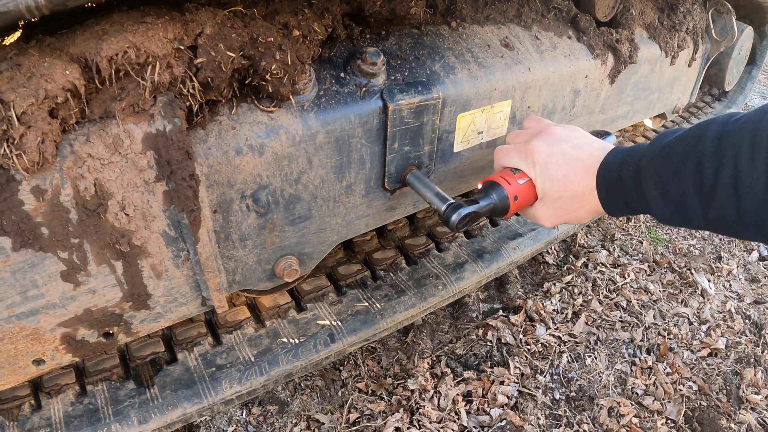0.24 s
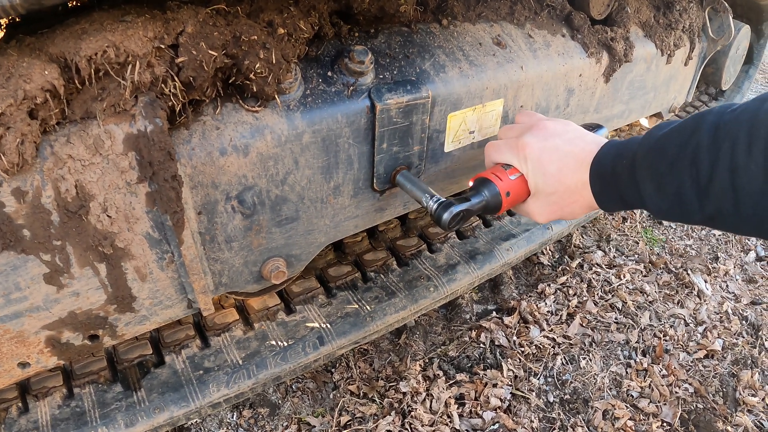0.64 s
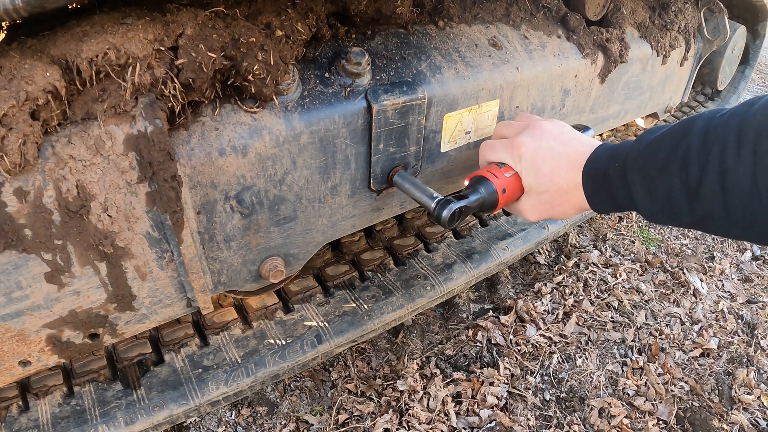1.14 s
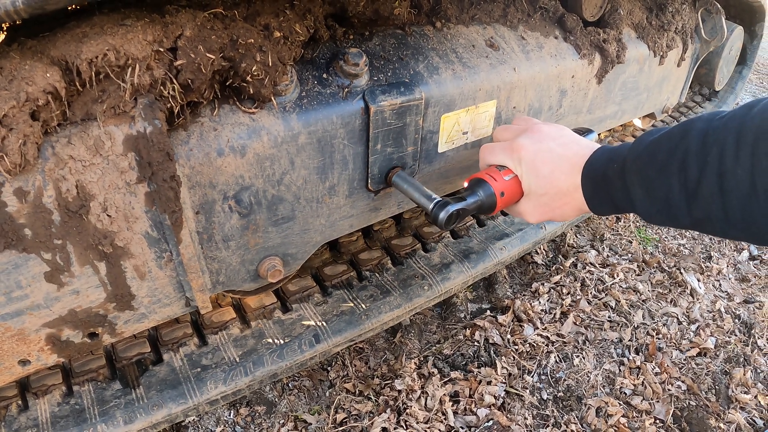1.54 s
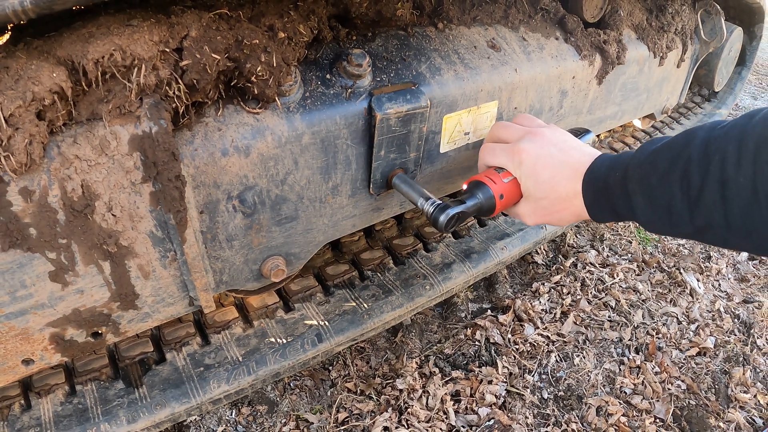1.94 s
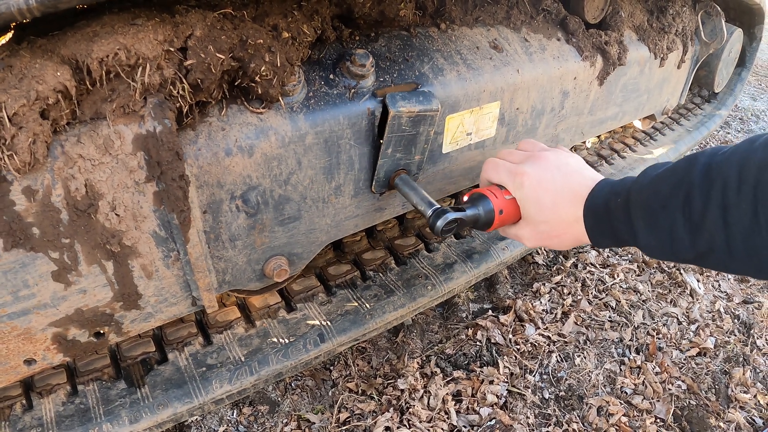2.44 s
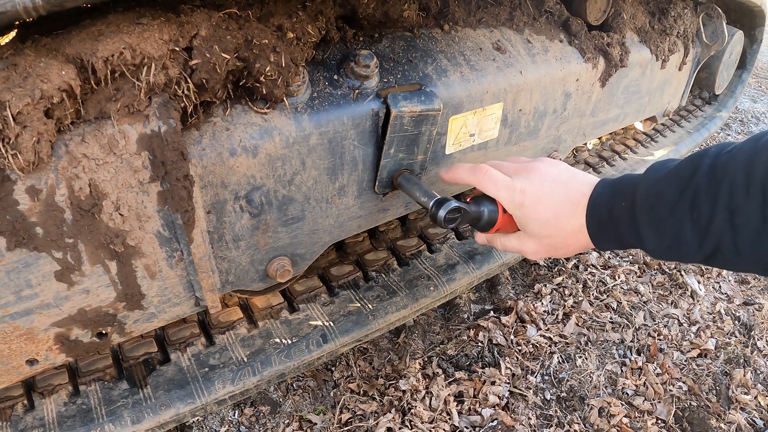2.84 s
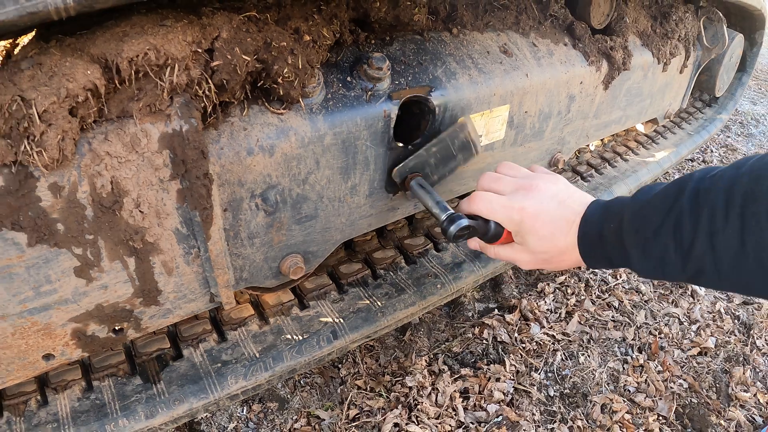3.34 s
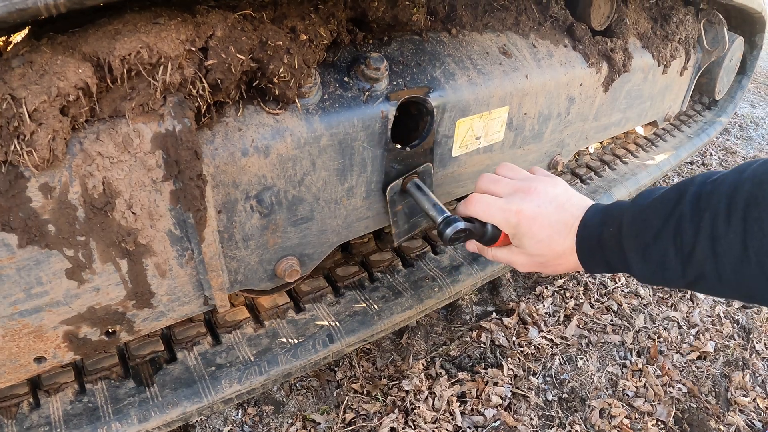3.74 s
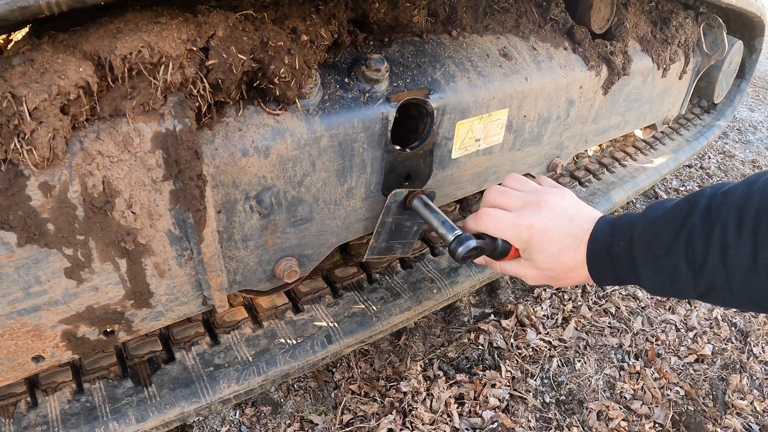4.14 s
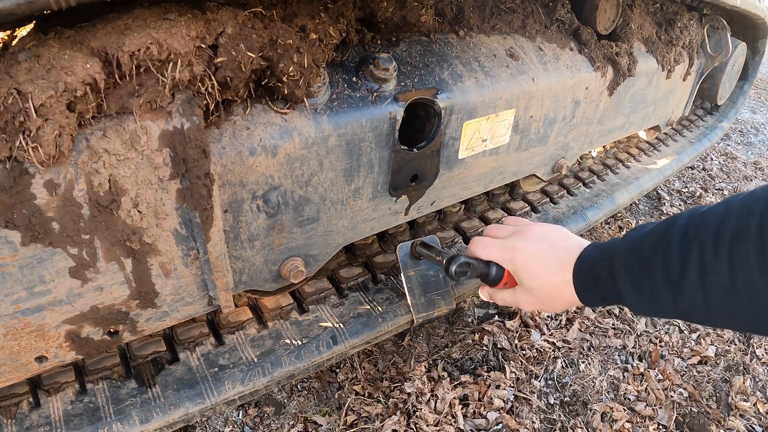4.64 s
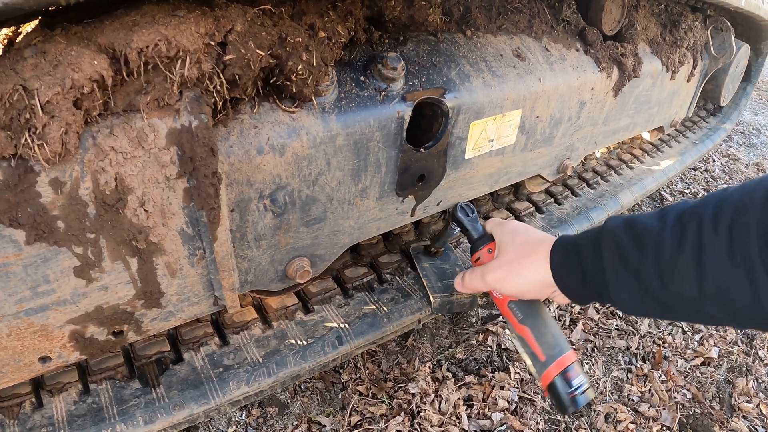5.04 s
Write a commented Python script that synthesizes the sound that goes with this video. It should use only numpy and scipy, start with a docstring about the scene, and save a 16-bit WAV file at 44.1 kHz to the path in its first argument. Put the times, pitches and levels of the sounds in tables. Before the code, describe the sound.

Close up outdoors, a cordless ratchet is already running with a fast, gritty rattle. It coasts down with small ticks, gets a second brief pull, then winds down ticking again. Over low distant rumble, a loosened steel plate scrapes faintly, swings down in a cluster of bright ringing clanks, quiets, then drops and settles on a rubber track with clanks and dull bumps. Close stereo microphone, little echo.

```python
"""Outdoors, over a low rumble, a cordless ratchet already runs, spinning a bolt out of a steel cover plate.
The crank knocks once a turn over grinding gears; two trigger pulls each end in a coast with pawl ticks.
The loose plate then rubs, swings down on its bolt, clanks and rings: noise clacks excite decaying modes.
It is lowered, drops off the socket and settles on the rubber track with dull bumps."""
import sys
import numpy as np
from scipy import signal
from scipy.fft import rfft, irfft
from scipy.io import wavfile
from scipy.ndimage import uniform_filter1d, map_coordinates

SR = 44100
rng = np.random.default_rng(int(sys.argv[2]) if len(sys.argv) > 2 else 0)


def waveform_to_disk(signal):
    """Save audio, clipped to [-1, 1], as 16-bit WAV at the path in sys.argv[1]."""
    frames = np.transpose(np.atleast_2d(signal))
    scaled = np.clip(frames, -1, 1) * 32767
    samples = np.round(scaled).astype(np.int16)
    wavfile.write(sys.argv[1], SR, samples)


N = 233553
TIME = np.arange(N) / SR

# modes of the steel plate, hanging on the bolt and lying on the track:
# (frequency [Hz], hanging level [dB], hanging t60 [s], lying level [dB], lying t60 [s])
PLATE_MODES = [(1008, -13, .6, -15.5, 0.4), (1757, -25.5, 0.22, -27, .1), (2277, -9, 0.79, -15, 0.27),
               (2478, -23.5, 0.12, -2.5, 0.17), (3140, 7.5, 0.062, 5.5, 0.11),
               (3860, -1.5, 0.53, -7.5, 0.27), (4350, -10.5, 0.24, -18, 0.28),
               (5050, -7.5, 0.087, -2, 0.15), (5710, -5, 0.34, -9, .13), (6960, -7.5, 0.086, -27, 0.32),
               (7520, -12.5, .14, -4, 0.055), (8300, -16, 0.26, -24.5, 0.091),
               (8020, -8.5, 0.16, -14, 0.085), (8500, -19, .25, -21, .11), (9970, -10, 0.15, -20, 0.083),
               (10900, -25, 0.079, -35, .1), (11300, -20, 0.079, -15, 0.093), (12170, -33.5, .25, -25, .17),
               (12860, -19.5, .22, -29, 0.093), (14050, -35.5, .2, -32, .11)]


def amp(db):
    """Decibels to amplitude ratio."""
    return 10 ** (np.asarray(db) / 20)


def evened(x):
    """Scale to unit RMS."""
    return x / np.sqrt(np.mean(x ** 2) + 1e-20)


def read(points, hz):
    """A curve joined by straight lines on a log-frequency axis."""
    f, value = np.transpose(points)
    return np.interp(np.log(hz + 1), np.log(f + 1), value)


def add(mix, start_s, sound):
    """Add a sound into the mix from start_s, cut at the end."""
    part = mix[:, max(round(start_s * SR), 0):][:, :sound.shape[-1]]
    part += sound[..., :part.shape[-1]]


def colour(x, db_at, size=4096):
    """Causal filter of unit energy, its gain shaped by db_at(hz)."""
    log_gain = np.log(amp(db_at(abs(np.fft.fftfreq(size, 1 / SR)))) + 1e-6)
    minimum_phase = np.exp(np.conj(signal.hilbert(log_gain)))
    taps = np.fft.ifft(minimum_phase).real[:size // 2]
    return signal.fftconvolve(x, taps / np.linalg.norm(taps))[:len(x)]


def wander(knots_per_s):
    """Random curve of unit spread, straight between knots."""
    knots = rng.standard_normal(1024)
    curve = map_coordinates(knots, [TIME * knots_per_s], order=1, mode="wrap")
    return curve * np.sqrt(3 / 2)  # restores the spread lost between knots


def burst(crack_s, body_s, body_db, size=4096):
    """A sharp crack, then the dense, quickly dying modes of a steel part, as decaying noise."""
    t = np.arange(size) / SR
    envelope = np.exp(-t / crack_s) + amp(body_db) * np.exp(-t / body_s)
    return rng.standard_normal(size) * envelope


def outdoors(level_db=-45, side_db=-15, drone_db=-50, drone_hz=74.0, swell_db=1.1):
    """Low rumble and wash, with a far, wavering drone; all rise a little as the tool stops."""
    # spectrum: (frequency [Hz], relative level [dB])
    rumble_colour = [(12, -43.5), (20, -13.5), (75, -3), (103, -9.5), (188, -11), (361, -22), (384, -30),
                     (436, -22), (597, -30), (835, -23), (927, -25), (1100, -26.5), (3000, -52),
                     (3900, -86.5), (6600, -120)]
    rise_at_s, rise_s, lull_db, risen_db = 2.08, 0.32, -4.4, 0
    mid, side = (colour(rng.standard_normal(N), lambda hz: read(rumble_colour, hz), size=16384)
                 for _ in range(2))
    stereo = mid + amp(side_db) * np.array([side, -side])
    wash = amp(level_db + swell_db * wander(2.8)) * stereo
    drone_phase = 2 * np.pi * np.cumsum(drone_hz + 3 * wander(12)) / SR
    drone = amp(drone_db) * np.sin(drone_phase) * (1 + 0.5 * wander(7.9))
    risen = np.clip((TIME - rise_at_s) / rise_s, 0, 1)
    return (wash + drone) * amp(lull_db + (risen_db - lull_db) * risen)


def echoes(x, near_db=-11, near_s=0.005, far_db=-29, far_s=0.025, size=12000):
    """Quick scatter from the machine's flank, shifting as the hand moves, and a faint tail from the yard."""
    t = np.arange(size) / SR
    decay_s = np.array([near_s, near_s, far_s])[:, None, None]
    taps = rng.standard_normal((3, 2, size)) * (t > 0.001) * np.exp(-t / decay_s)
    taps /= np.linalg.norm(taps, axis=2, keepdims=True)
    flank, track, yard = signal.fftconvolve(x[None, None], taps, axes=2)[..., :N]
    angle = 4 * TIME + 0.6 * wander(12)  # rad
    near = np.cos(angle) * flank + np.sin(angle) * track
    return amp(near_db) * near + amp(far_db) * yard


def slide(rustle_db=-81, flicker_db=2.5):
    """Shaped noise: faint uneven friction swells and fades with each stroke, over the hand's rustle."""
    # spectrum: (frequency [Hz], relative level [dB])
    friction_colour = [(500, -11.5), (1500, -5), (3200, -0.5), (6000, -4), (8000, -8.5), (10000, -16),
                       (13000, -11), (15000, -37)]
    # swells of noise: strokes of friction, and at 4.17 s a faint dull noise, mostly below 3 kHz: (start [s],
    # length [s], level [dB], tilt above 2 kHz [dB per octave])
    swells = [(2.438, 0.53, -64.5, -2.5), (2.93, 0.18, -60.5, 1.5), (3.091, 0.43, -63.5, 0.5),
              (3.486, 0.27, -51, -0.5), (4.17, 0.55, -65.5, -17), (4.6, 0.46, -69.5, 2),
              (4.846, 0.44, -56.5, -3)]
    rustle = colour(rng.standard_normal(N), lambda hz: read(friction_colour, hz))
    out = amp(rustle_db) * rustle[None]
    for start_s, length_s, db, tilt in swells:
        t = np.arange(0, length_s, 1 / SR)
        hiss = colour(rng.standard_normal(SR), lambda hz: (
            read(friction_colour, hz) + tilt * np.log2(np.maximum(hz / 2000, 1))))
        add(out, start_s, amp(db) * np.sin(np.pi * t / length_s) * hiss[:len(t)])
    return out[0] * amp(flicker_db * wander(110))


def bumps(decay_s=0.043):
    """Plate and tool against the rubber track: a short low push and no ring."""
    # bumps: (time [s], relative level [dB])
    thuds = [(4.546, -35.5), (4.612, -35.5), (4.708, -39), (4.876, -37.5), (4.936, -30), (4.99, -35)]
    # spectrum: (frequency [Hz], relative level [dB])
    rubber_colour = [(60, -0.5), (200, 3.5), (400, -6), (750, -4), (1100, -10.5), (2000, -23), (6000, -41)]
    out, t = np.zeros((1, N)), np.arange(6000) / SR
    for start_s, db in thuds:
        push = rng.standard_normal(len(t)) * np.exp(-t / decay_s)
        add(out, start_s, amp(db) * colour(push, lambda hz: read(rubber_colour, hz)) / 2)
    return out[0]


def with_rebounds(blows):
    """Every blow rebounds once, after an uneven delay, with a weaker clack and ring; in order of time."""
    delay_s, delay_spread, clack_drop_db, ring_drop_db = 0.021, 0.28, -15.5, -23.5
    delays_s = delay_s * np.exp(delay_spread * rng.standard_normal(len(blows)))
    rebounds = [(s + delay, clack_db + clack_drop_db, tilt, ring_db + ring_drop_db, hz)
                for (s, clack_db, tilt, ring_db, hz), delay in zip(blows, delays_s)]
    return sorted(blow for blow in blows + rebounds if blow[0] < TIME[-1])


def clacks(blows, chatter_s=0.0042, tail_s=0.017, tail_db=-15, mode_lift_db=10, mode_width_hz=120):
    """Steel chatters on steel for a few milliseconds, coloured by the modes of the plate."""
    # spectrum of steel striking steel: (frequency [Hz], relative level [dB])
    steel_colour = [(100, -5.5), (350, -12.5), (650, 0.5), (1000, 1.5), (1300, 7.5), (1750, 0), (2100, 0),
                    (2550, 3), (3150, 6), (3700, -3), (5000, -3), (6200, -14.5), (8000, -20.5),
                    (13000, -38.5)]
    out, t = np.zeros((1, N)), np.arange(4096) / SR
    shape = np.exp(-(t / chatter_s) ** 2) + amp(tail_db) * np.exp(-t / tail_s)
    hz = np.fft.rfftfreq(4096, 1 / SR)
    peaks = sum(1 / (1 + (2 * (hz - mode[0]) / mode_width_hz) ** 2) for mode in PLATE_MODES)
    steel_db = read(steel_colour, hz) + mode_lift_db * peaks
    for start_s, clack_db, tilt, _, _ in blows:
        blow_db = steel_db + tilt * np.log2(np.maximum(hz, 300))
        clack = colour(rng.standard_normal(len(t)) * shape, lambda f: np.interp(f, hz, blow_db))
        clack *= np.linalg.norm(shape) / np.linalg.norm(clack) / 2  # same energy whatever the tilt
        add(out, start_s, amp(clack_db) * clack)
    return out[0]


def lobes(swing, hz, turning_db=3.0, turning_per_s=22, port_spread_rad=0.5):
    """Modes beam in lobes that sweep past as the plate turns, unlike at each port; high modes deepest."""
    out = np.zeros((2, N))
    for size, f in zip(swing, hz):
        depth = min(f / 6000, 1)
        phase = 2 * np.pi * f * TIME + 0.1 * wander(40)
        apart = port_spread_rad * np.sqrt(depth) * wander(turning_per_s)
        beam = amp(turning_db * depth * wander(turning_per_s))
        out += size * beam * np.sin(phase + np.array([apart, -apart]))
    return out


def plate(blows, drop_s=4.92, focus_db=13, focus_octaves=0.35, grip=1.34, rise_s=0.0035):
    """Blows check the old ring and start a new one; the spot struck picks modes, the support damps them."""
    hz, hang_db, hang_t60, lie_db, lie_t60 = np.transpose(PLATE_MODES)
    swing, held = np.zeros((len(hz), N)), np.zeros((len(hz), 1))
    starts = [round(blow[0] * SR) for blow in blows] + [N]
    for (s, clack_db, _, ring_db, favoured_hz), start, end in zip(blows, starts, starts[1:]):
        mode_db, t60 = (hang_db, hang_t60) if s < drop_s else (lie_db, lie_t60)
        octaves_off = np.log2(hz / favoured_hz)
        share_db = focus_db * (np.exp(-(octaves_off / focus_octaves) ** 2) - 1)
        # a hard contact damps the high modes most
        kept = np.exp(-grip * amp(clack_db) * hz[:, None] / 4000)
        struck = np.hypot(held * kept, amp(ring_db + mode_db + share_db)[:, None])
        t = np.arange(max(end - start, 1)) / SR
        # a soft, rubbing contact swells slowly
        contact_s = np.clip(rise_s * amp(ring_db - clack_db), 0.0003, 0.02)
        level = struck + (held - struck) * np.exp(-t / contact_s)
        part = level * np.exp(-np.log(1000) * t / t60[:, None])
        swing[:, start:start + len(t)] = part
        held = part[:, -1:]
    return lobes(swing, hz)


def pawl():
    """The pawl snaps over single teeth as the head slows."""
    # clearest ticks at low speed: (time [s], relative level [dB])
    ticks = [(1.246, -26), (1.2683, -25.5), (1.274, -24.5), (1.3041, -24.5), (1.312, -30), (1.352, -24.5),
             (1.360, -28), (1.408, -24), (1.416, -20), (2.009, -18.5), (2.109, -20.5), (2.1404, -23),
             (2.179, -21.5), (2.193, -26.5), (2.23, -25), (2.2834, -25.5), (2.295, -26.5), (2.407, -29)]
    # spectrum: (frequency [Hz], relative level [dB])
    tick_colour = [(300, -34), (900, 2), (2000, -8.5), (4000, -4), (7000, -5.5), (9000, -16), (12500, -1),
                   (15000, -6.5)]
    out = np.zeros((1, N))
    for start_s, db in ticks:
        tick = colour(burst(0.00038, 0.0057, -7.0), lambda hz: read(tick_colour, hz))
        add(out, start_s, amp(db) * tick)
    return out[0]


def motor():
    """Crank speed [turns/s], its share of full speed, and load: run-up under power, coast against friction."""
    # trigger pulls: (press [s], release [s], full crank speed [turns/s])
    pulls = [(-0.5, 1.0135, 76.46), (1.42, 1.849, 76.82)]
    spin_up_s, coast_s, friction_turns_per_s2 = 0.0351, 0.517, 73.37
    # the tight first threads slow the crank until the bolt runs free
    thread_drag_turns_per_s, free_s, ease_s = 3.23, 0.344, 0.1
    speed, load = np.zeros(N), np.zeros(N)
    drag = friction_turns_per_s2 * coast_s
    for press, release, full in pulls:
        on, off = TIME >= press, TIME >= release
        speed[on] = full + (speed[on][0] - full) * np.exp(-(TIME[on] - press) / spin_up_s)
        load[on & ~off] = 1 - speed[on & ~off] / full
        coasting = (speed[off][0] + drag) * np.exp(-(TIME[off] - release) / coast_s) - drag
        speed[off] = np.maximum(coasting, 0)
    threads = thread_drag_turns_per_s * np.clip((free_s - TIME) / ease_s, 0, 1)
    return speed - threads, (speed - threads) / full, load + threads / full


def housing_db(hz):
    """Broad colour of the tool's head and housing, with its resonances."""
    # broad spectrum: (frequency [Hz], relative level [dB])
    broad = [(140, -8.5), (420, -15), (530, -9.5), (720, -4.5), (950, -4.5), (1200, -3.5), (1500, -5),
             (2100, -2.5), (3000, -1), (4300, 0.5), (4900, -4.5), (7400, -6), (8400, -10.5), (13300, -12.5)]
    # resonances: (frequency [Hz], width [Hz], lift [dB])
    resonances = [(770, 190, 3.5), (1086, 130, 5), (1262, 100, 6), (1716, 170, 6.5), (2680, 180, 1),
                  (4180, 170, 2), (5265, 160, 3.5), (7180, 800, 4.5), (10380, 270, 4.5), (12360, 2100, 6)]
    lift = sum(db / (1 + (2 * (hz - f) / width) ** 2) for f, width, db in resonances)
    return read(broad, hz) + lift


def knocks(turns, at, alike, spread_db, jitter_s, body_s, body_db):
    """One knock near the same crank angle of each turn, partly alike from turn to turn."""
    own = np.sqrt(1 - np.clip(alike, 0, 1))
    usual, out = burst(0.00054, body_s, body_db), np.zeros((1, N))
    for s in TIME[1:][np.diff(np.floor(turns - at)) > 0]:
        size, late = rng.standard_normal(2)
        knock = np.sqrt(1 - own ** 2) * usual + own * burst(0.0022, body_s, body_db)
        add(out, s + jitter_s * late, amp(spread_db * size) * knock)
    return out[0]


def gear_rattle(turns, speed, grind_db=-5, pawl_db=-9, mesh_db=-9, grain_db=2.5, grains_per_s=5000,
                slow_db=-11, slow_pawl_db=-1):
    """The crank drives the pawl (a knock) and draws it back over two teeth (ticks) while the gears grind."""
    drive = evened(knocks(turns, 0, alike=0.38, spread_db=1.3, jitter_s=0.00012, body_s=0.004, body_db=-2))
    back = sum(knocks(turns, at, alike=0.4, spread_db=2.2, jitter_s=0.0003, body_s=0.002, body_db=-3)
               for at in (0.58, 0.74))
    back = evened(colour(back, lambda hz: read([(1000, -4), (6000, 6.5), (11000, -0.5)], hz)))
    # worn teeth scrape at random
    grain = rng.standard_normal(N) * amp(grain_db * np.minimum(rng.exponential(1, N), 4))
    grind = evened(grain * (rng.random(N) < grains_per_s / SR))
    # the same flaws come round again with every turn
    flaws = rng.standard_normal(48)
    tooth = np.floor(turns * len(flaws)).astype(int)
    passing = np.diff(tooth, prepend=tooth[0])
    mesh = evened(passing * flaws[tooth % len(flaws)] * (1 + 0.5 * rng.standard_normal(N)))
    # a coasting crank hardly knocks, but the pawl ticks on
    slow = np.clip((62 - speed) / 32, 0, 1)
    moving = amp(slow_db * slow) * drive + amp(pawl_db + slow_pawl_db * slow) * back
    return moving + amp(mesh_db) * mesh + amp(grind_db) * grind


def rocking_colour(rattle, pace, clatter_db=3.5, clatter_width_hz=380, patch_db=1.87):
    """Housing colour that shifts as the tool rocks in the hand, evened to a steady level."""
    # treble tilt [dB/octave]: at first, gained each second as the bolt loosens, lost on coming to rest
    tilt_db, brighten_db_per_s, dull_db = -1, 0.8, 7
    # the clatter favours a pitch that strays as the socket rocks on the bolt
    clatter_hz, stray_hz, rocks_per_s = 3150, 330, 10
    hz, t, z = signal.stft(colour(rattle, housing_db), SR, nperseg=512)
    patches = uniform_filter1d(rng.standard_normal(z.shape), 5, 0)
    patches = evened(uniform_filter1d(patches, 18, 1))
    brightness = tilt_db + brighten_db_per_s * TIME - dull_db * (1 - pace) ** 2
    tilt = np.interp(t, TIME, brightness) * np.log2(np.clip(hz, 500, 7500) / 3000)[:, None]
    favoured_hz = np.interp(t, TIME, clatter_hz + stray_hz * wander(rocks_per_s))
    clatter = clatter_db * np.exp(-((hz[:, None] - favoured_hz) / clatter_width_hz) ** 2)
    z = z * amp(tilt + clatter + patch_db * patches)
    rattle = signal.istft(z, SR, nperseg=512)[1][:N]
    power = uniform_filter1d(uniform_filter1d(rattle ** 2, size=2400), size=1200)
    return rattle / np.sqrt(abs(power) + 1e-12)


def gear_hum(turns, waver_db=3):
    """Tones of crank and gears at multiples of the crank speed."""
    # tones: (multiple of crank speed, level relative to the rattle [dB])
    tones = [(1, -38.5), (2, -27.5), (3, -36), (4, -36.5), (5, -37.5), (7, -32), (8, -30.5), (14, -21.5),
             (48, -30)]
    shaft = turns + 0.013 * wander(50)
    return sum(amp(db + waver_db * wander(9)) * np.sqrt(2)
               * np.sin(2 * np.pi * (round(k) * shaft + rng.random())) for k, db in tones)


def ratchet():
    """Gear rattle and hum, their level following speed and load above the motor's own whir."""
    # at full speed; rise per tenfold speed; rise under a stalling load
    drive_db, speed_law_db, strain_db = -22.5, 34, 14
    # the whir lasts until the crank is almost still
    whir_db, whir_fade_turns_per_s = -47.5, 8.7
    speed, pace, load = motor()
    turns = np.cumsum(speed) / SR - 0.108
    rattle = rocking_colour(gear_rattle(turns, speed), pace)
    geared = amp(drive_db + speed_law_db * np.log10(pace + 1e-9) + strain_db * load)
    whir = amp(whir_db) * np.minimum(speed / whir_fade_turns_per_s, 1)
    return (rattle + gear_hum(turns) * pace ** 3) * np.hypot(geared, whir)


def scene():
    """Tool and plate close in front of a pair of microphone ports."""
    # blows of plate, bolt and socket: tipping loose, swinging down from 3.49 s, lowered from 4.46 s,
    # dropped and settling from 4.94 s: (time [s], clack level [dB], clack tilt [dB per octave],
    # ring level [dB], favoured pitch [Hz])
    contacts = [ (2.501, -39.5, 6.5, -61, 6140), (3.245, -38, 14.5, -74, 7860), (3.289, -44, 13, -45, 9900),
                (3.368, -48, -7, -45.5, 3030), (3.379, -41, 13.5, -68, 10100), (3.431, -43, 17, -73, 10000),
                (3.4879, -25.5, 8.5, -34, 5840), (3.495, -25, -3.5, -28.5, 7000),
                (3.5285, -14.5, 5, -22, 6260), (3.5749, -14, -1, -16.5, 4620),
                (3.5997, -8.5, -1.5, -15, 2920), (3.6187, -8.5, 0, -4.5, 2300), (3.6227, -7, 8, -36, 7300),
                (3.63, -24, -3, -48, 2500), (3.6799, -15, 0, -26, 5140), (3.7334, -29.5, -5, -31, 3560),
                (3.7618, -20, 4, -55, 5000), (3.7748, -15.5, -0.5, -29, 2400), (3.792, -33, 5, -53, 3500),
                (3.834, -30.5, 11, -34.5, 7950), (3.973, -36.5, -1.5, -50, 4970),
                (4.008, -47, 12, -56, 4470), (4.162, -45.5, -3.5, -53.5, 4820),
                (4.4614, -28.5, 5.5, -54.5, 5840), (4.5425, -40, 4, -54, 5400),
                (4.553, -37, 10, -52, 10000), (4.611, -42, -8, -60, 5700), (4.7085, -42, -11.5, -75, 6070),
                (4.772, -41.5, 3, -68, 5900), (4.877, -44, -5, -67, 5000), (4.886, -39.5, 2, -60, 5000),
                (4.9368, -9.5, -0.5, -55, 2400), (4.961, -18.5, 6, -12.5, 6100),
                (4.9882, -16, 3.5, -10, 3180), (5.014, -25.5, -3, -15.5, 4000),
                (5.079, -30.5, 1.5, -55, 5000), (5.1428, -29, 2.5, -40, 3000),
                (5.2035, -31, -6.5, -71, 4900)]
    # lead of the left port: (frequency [Hz], phase [rad])
    left_lead = [(50, 0), (250, -.35), (600, -.55), (1900, -.7), (3900, -.75), (5000, -.5), (7500, -.45),
                 (8500, -.2), (11500, 0), (13000, 2.3)]
    # level of the left port over the right: (frequency [Hz], difference [dB])
    left_over_right = [(60, 0), (110, 5), (200, 1.5), (380, 1), (700, -1), (1290, 1), (2380, 0.5),
                       (4400, 1), (8120, -0.5), (15000, -3)]
    blows = with_rebounds(contacts)
    work = slide() + bumps() + clacks(blows) + plate(blows) + pawl() + ratchet()
    hz = np.fft.rfftfreq(2 * N, 1 / SR)
    port = amp(read(left_over_right, hz) / 2) * np.exp(1j * read(left_lead, hz) / 2)
    direct = irfft(rfft(work, 2 * N) * np.array([port, 1 / port]))[:, :N]
    return outdoors() + echoes(work.mean(0)) + direct


def record(dry, ceiling=0.55, edge_hz=15500):
    """The loudest peaks are rounded off, the microphones fade above 13 kHz, then a band limit."""
    top = [(13200, 0), (13700, -4), (14300, -14), (15500, -22)]  # (frequency [Hz], gain [dB])
    rounded = ceiling * np.tanh(dry / ceiling)
    gain = amp(read(top, np.fft.rfftfreq(2 * N, 1 / SR)))
    soft = irfft(rfft(rounded, 2 * N) * gain)[:, :N]
    low_pass = signal.firwin(511, edge_hz, window=("kaiser", 9), fs=SR)
    return signal.oaconvolve(soft, low_pass[None], "same")


dry = scene()
out = record(dry)
waveform_to_disk(out)
```